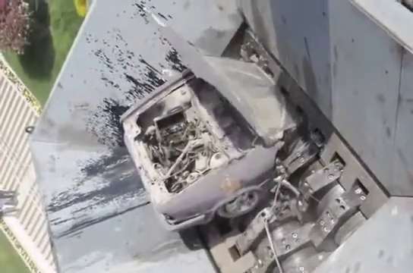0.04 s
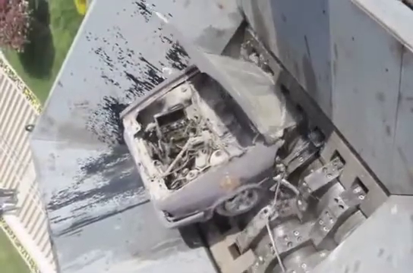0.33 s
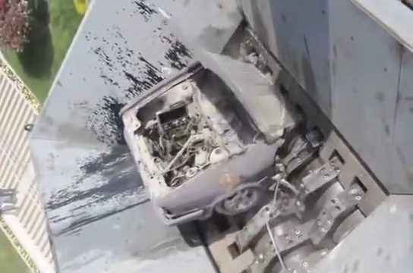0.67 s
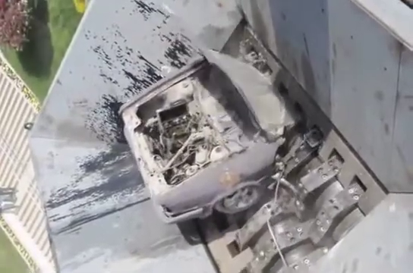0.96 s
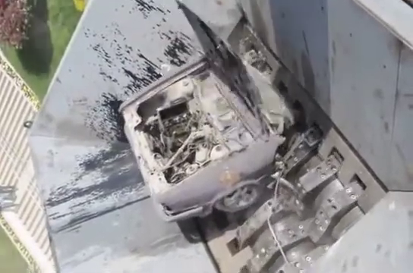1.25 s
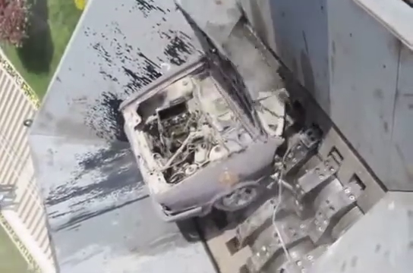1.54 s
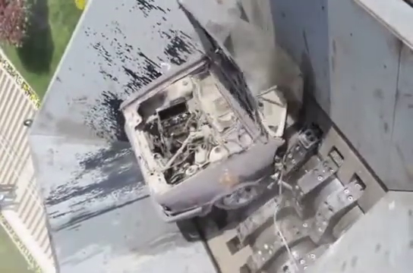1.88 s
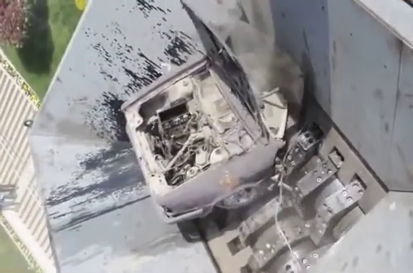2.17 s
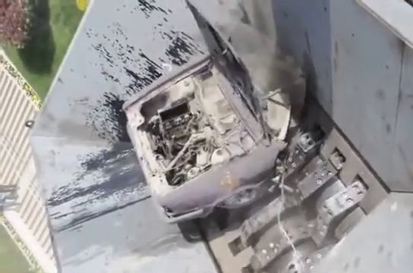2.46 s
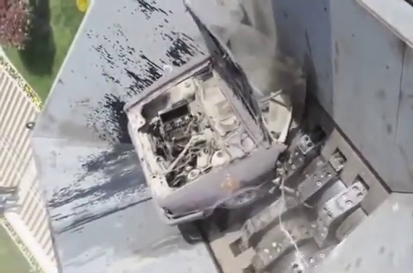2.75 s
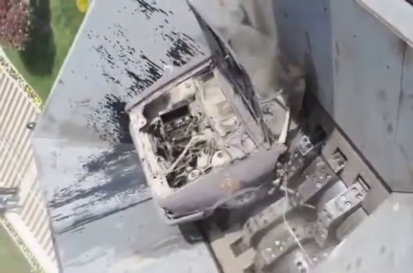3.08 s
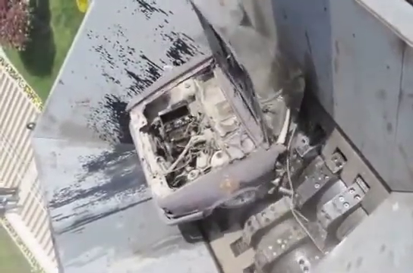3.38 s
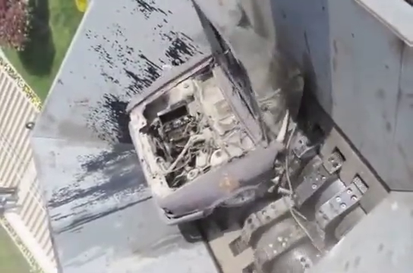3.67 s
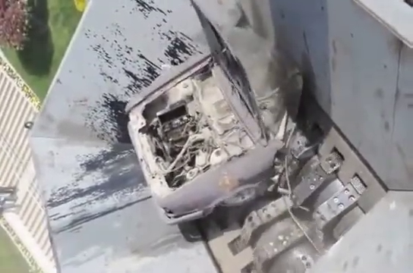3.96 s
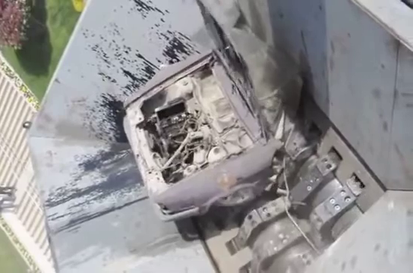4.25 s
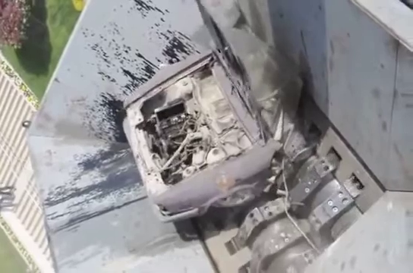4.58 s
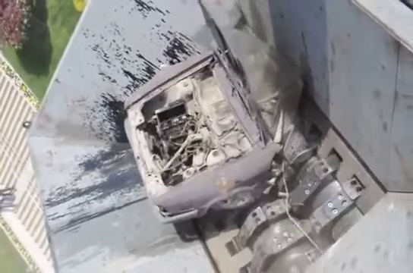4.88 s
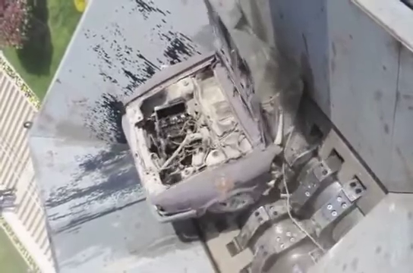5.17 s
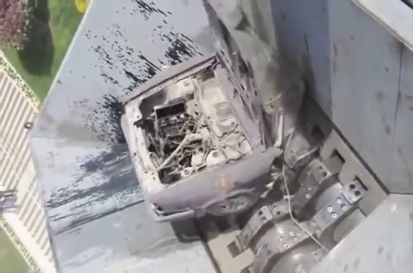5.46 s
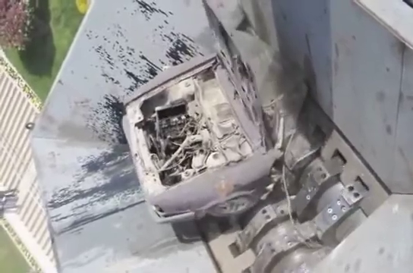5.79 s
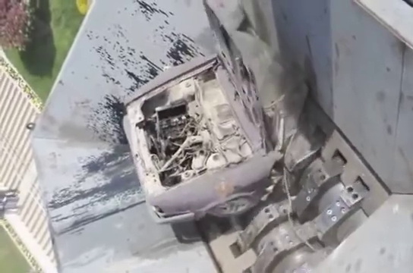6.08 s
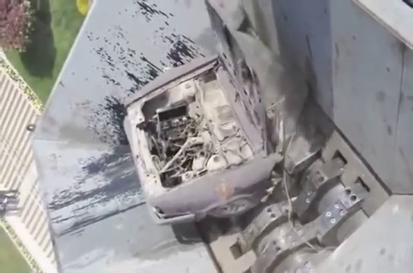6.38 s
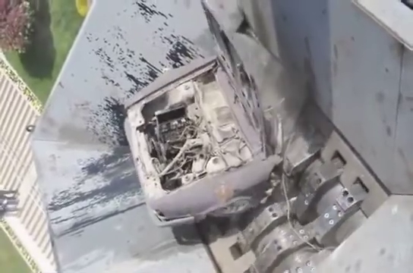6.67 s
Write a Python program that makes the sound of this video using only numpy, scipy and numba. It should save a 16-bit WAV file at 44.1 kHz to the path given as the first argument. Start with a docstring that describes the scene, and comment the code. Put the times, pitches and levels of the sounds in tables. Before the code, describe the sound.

Over the steady whine of hydraulic pumps, a car body crunches and crackles as a slow shredder draws it in. Parts snap and clank throughout, with two especially sharp bangs before the midpoint. Toward the end come a low shudder, a short tearing groan, a thin buzz and a ringing scrape. The microphone is above the steel hopper, which adds a short echo.

```python
"""A scrapyard: a slow twin-shaft shredder tears up a car body in its steel hopper.
Two hydraulic pumps whine underneath. Stick-slip on the cutters makes a panel judder, an edge buzz and
a strut and a bar scrape; a seam groans open. Up front, sheet metal crumples in a stream of small
fractures and gives way in sharp cracks and clanks. A limiter ducks the mix after the loudest bangs."""
import sys
import numpy as np
from scipy import signal
from scipy.fft import rfft, irfft
from scipy.io import wavfile
from scipy.ndimage import uniform_filter1d
from numba import njit

SR = 44100
rng = np.random.default_rng(int(sys.argv[2]) if len(sys.argv) > 2 else 0)


def store_pcm(level_fs):
    """Save levels as 16-bit WAV."""
    pcm = np.round(np.clip(level_fs, -1, 1) * 32767).astype(np.int16)
    wavfile.write(sys.argv[1], SR, np.atleast_2d(pcm).T)


N = 296793
TIME = np.arange(N) / SR

# steady partials of the pump whine: (multiple of the piston rate, level [dB])
PUMP_PARTIALS = [(1, -40), (3, -38), (4, -41.5), (5, -42), (8, -43.5)]
# two partials sing out as the pump's load shifts: (time [s], second partial [dB], sixth partial [dB])
LOAD_PARTIALS = [(0, -27, -39), (.7, -26, -34.5), (1.4, -25, -27.5), (2.5, -29.5, -27.5), (2.9, -30, -28),
                 (3.4, -30.5, -30), (3.9, -25, -25), (4.201, -31, -31.5), (4.85, -27, -27),
                 (5.4, -35.5, -36.5), (5.9, -40, -31.5), (6.73, -31.5, -27.5)]
# a second pump beats against the first: (time [s], pitch [Hz], level [dB])
SECOND_PUMP = [(1, 462, -74), (1.6, 465.7, -37), (2.3, 457.3, -38), (3.5, 456.2, -43.5), (4.6, 465, -33),
               (5.1, 455.3, -42), (5.6, 465.6, -39.5), (6.73, 459, -41)]
# a thin edge chatters: (time [s], level [dB])
CHATTER = [(5.66, -41), (5.72, -30), (5.78, -27), (5.83, -49), (5.85, -64)]
# a panel sticks and slips on a cutter: (time [s], slip rate [Hz], level [dB])
JUDDER = [(4.44, 34, -46), (4.53, 34.3, -28.5), (4.9, 34.3, -31), (4.99, 37, -37), (5.28, 41, -30.5),
          (5.5, 33.8, -33), (5.66, 33.7, -39), (5.78, 30, -32), (5.86, 34, -53)]
# low drone of that panel: (frequency [Hz], level [dB], t60 [s])
PANEL_MODES = [(68, -17, 0.13), (106, -2, 0.074), (136, 4.5, 0.13), (177.4, 4.5, 0.23), (204, 1.5, 0.15)]
# a seam tears open: (time [s], level [dB])
GROAN = [(5.21, -34), (5.25, -20), (5.31, -21.5), (5.37, -21.5), (5.41, -18), (5.48, -19.5), (5.53, -37)]
# midrange body of the tearing sheet: (frequency [Hz], level [dB], t60 [s])
SEAM_MODES = [(383, -3.5, 0.032), (510, -1.5, 0.019), (770, -7, 0.024), (938, 1, 0.023),
              (1085, -0.5, 0.017), (1410, -6, 0.011), (1766, -9, 0.022), (2480, -12, 0.018)]
# a cutter bears on a thin strut, later on a steel bar: (time [s], pressure [dB])
STRUT_SCRAPE = [(1.495, -46), (1.52, -12.5), (1.54, -40), (1.58, -18), (1.63, -45)]
BAR_SCRAPE = [(6.0, -51), (6.02, -25.5), (6.06, -19.5), (6.09, -16.5), (6.125, -22), (6.15, -26),
              (6.19, -38)]
# bright ring of the strut and the bar: (frequency [Hz], level [dB], t60 [s])
STRUT_MODES = [(2280, -2.5, 0.12), (3300, -2, .15), (3750, -1, .08), (4270, -3, .04), (5400, -4, .06)]
BAR_MODES = [(2630, -13, .12), (3100, -7, 0.14), (3300, -12, .1), (3837, -2.5, 0.2), (4330, -3, .02),
             (4680, -2.5, .025), (5020, -5, 0.04), (5440, -3, 0.025)]
# tone colour of the torn bodywork: (frequency [Hz], spectral level [dB])
SHEET_COLOUR = [(30, -38), (70, -40), (110, -14), (180, -8.5), (300, 3), (550, 0), (800, 1), (1250, -5.5),
                (1600, -7.5), (2100, -12), (2700, -11.5), (3600, -14.5), (5000, -14)]
# three sizes of piece, panels, folds and splinters: (low edge [Hz], high edge [Hz], base t60 [s])
PIECES = [(25, 606, 0.075), (780, 2150, 0.088), (1980, 5180, 0.027)]
# balance of the crumpling: (panels [dB], folds [dB], splinters [dB])
CRUMPLE_MIX_DB = (2.5, 0, -2.5)
# bed of crumpling as the cutters draw the body in: (time [s], level [dB], brightness [dB])
FEED = [(0, -32, 0.5), (0.24, -33.5, -1), (0.6, -30, 1), (1.1, -27.5, -0.5), (1.4, -29.5, 0),
        (1.75, -27.5, -1.5), (2.4, -27, 1), (2.75, -25, -1), (3.24, -34.5, -0.5), (3.55, -30, 1.5),
        (4.15, -27.5, -1.5), (4.38, -33, 1), (4.47, -26.5, 0.5), (4.8, -28, -1), (5.4, -28, -0.5),
        (5.57, -30, -1), (5.9, -28, 2.5), (6.65, -30.5, -0.5)]
# swells as a cutter catches a sheet and folds it: (start [s], length [s], level [dB], brightness [dB])
FOLDS = [(0.077, 0.064, -31, 5), (0.275, 0.06, -23.5, 0.5), (0.462, 0.086, -27.5, -3),
         (0.838, .19, -26.5, 3), (1.257, 0.056, -25.5, 2), (1.482, 0.14, -27.5, 6), (1.678, 0.042, -24, -7),
         (2.166, 0.14, -27, -3), (2.351, 0.04, -25.5, 1.5), (2.791, 0.14, -30, -12), (2.95, .08, -33, -7),
         (3.283, 0.15, -30, 5.5), (3.794, 0.072, -28.5, 0), (4.016, 0.078, -20, 1), (4.112, 0.032, -27, 2),
         (4.234, .08, -29, 2.5), (5.044, 0.049, -23.5, 0), (5.231, 0.12, -26.5, 1.5),
         (5.698, 0.11, -29.5, -4), (6.195, 0.061, -24.5, 1), (6.321, 0.089, -23.5, 2),
         (6.436, .07, -27, -1), (6.664, .1, -24, 0)]
# parts spring free with a pitched clank or boom: (time [s], pitch [Hz], level [dB])
CLANKS = [(1.644, 3150, -19.5), (1.924, 893, -17), (2.624, 1140, -12.5), (2.651, 1800, -12.5),
          (2.875, 2700, -13), (3.267, 1634, -15.5), (3.941, 703, -17), (3.954, 1767, -13.5),
          (4.233, 195, -14.5), (4.432, 790, -23), (5.498, 580, -16), (5.844, 1540, -9), (6.127, 775, -18),
          (6.383, 4520, -11)]
# parts give way; big ones thud, small ones snap: (time [s], level [dB], brightness [dB])
CRACKS = [(0.079, -20, -1.5), (0.31, -19, -6), (0.321, -21.5, -0.5), (0.336, -20, -5), (0.405, -22.5, -1),
          (0.485, -23, 3.5), (0.5, -22, 2.5), (0.536, -14.5, -6), (0.604, -20, -5), (0.665, -22.5, -0.5),
          (0.695, -26.5, 0.5), (0.752, -22.5, -0.5), (0.837, -19, 0.5), (0.864, -18.5, 0.5),
          (0.93, -21.5, -5.5), (1.155, -11, -2.5), (1.306, -24.5, 1), (1.55, -21.5, 7), (1.645, -20.5, 4),
          (1.688, -16, -6.5), (1.782, -23.5, 0), (1.87, -22.5, 0.5), (1.922, -19.5, -1),
          (2.032, -22.5, -0.5), (2.19, -21, 1), (2.27, -16.5, -15), (2.352, -18.5, 0.5), (2.421, -21.5, 22),
          (2.443, -20, -2.5), (2.623, -20.5, -4), (2.649, -8.5, 6), (2.846, -23, -0.5), (2.874, -8.5, 6.5),
          (2.947, -19, 1), (2.971, -17, 2.5), (3.113, -19, 2), (3.167, -15, 1), (3.185, -21.5, -20),
          (3.266, -15, 10), (3.462, -14, -6.5), (3.472, -15, -1), (3.875, -26, 10), (3.941, -19.5, 0.5),
          (3.954, -26, -2.5), (4.064, -19, 7), (4.083, -14.5, 2), (4.18, -20, 5), (4.234, -19, 2.5),
          (4.25, -19.5, -4), (4.298, -22.5, 7), (4.431, -21, -2), (4.881, -23, 6), (4.924, -18.5, 4.5),
          (4.95, -14, 3), (5.07, -24.5, 5), (5.093, -24, -3), (5.18, -24, 8.5), (5.24, -19.5, -8.5),
          (5.497, -21, -5), (5.748, -27, -1), (5.843, -15, 0), (6.035, -19, -3.5), (6.127, -18, -1.5),
          (6.206, -20.5, -9), (6.383, -15.5, 4), (6.483, -19, -1.5), (6.508, -26, -4)]


def undb(db):
    """Decibels to gain."""
    return 10 ** (np.asarray(db) / 20)


def unit(x):
    """Scale to rms 1."""
    return x / np.sqrt(np.mean(x ** 2) + 1e-18)


def curves(table):
    """Automation curves: a table's columns, joined by straight lines in time."""
    times, *columns = np.transpose(table)
    return [np.interp(TIME, times, column) for column in columns]


def fader(table):
    """Gain from a table's last column, muted outside its time span."""
    active = (TIME >= table[0][0]) & (TIME <= table[-1][0])
    return active * undb(curves(table)[-1])


def wander(rate_hz):
    """Smooth random modulation with a spread near 1."""
    step = max(int(SR / rate_hz), 2)
    return uniform_filter1d(np.repeat(rng.standard_normal(1024), step)[:N], step)


def convolve(x, response):
    """Pass a sound through an impulse response."""
    return signal.oaconvolve(x, response)[:N]


def clicks(times, sizes):
    """A train of single impulses."""
    return np.bincount(np.clip(times * SR, 0, N - 1).astype(int), sizes, N)


def slips(hz, jitter, scatter_db):
    """Stick-slip: one impulse a cycle, uneven in timing and force."""
    cycles = np.floor(np.cumsum(hz * (1 + jitter * wander(40))) / SR)
    return np.diff(cycles, prepend=0) * undb(scatter_db * rng.standard_normal(N))


def ring(drive, modes):
    """Drive damped modes; each one's level sets its share of the response's energy."""
    t = TIME[:SR // 2]
    response = sum((-1) ** k * undb(db) * unit(np.cos(2 * np.pi * hz * t) * undb(-60 * t / t60))
                   for k, (hz, db, t60) in enumerate(modes))
    return unit(convolve(drive, response))


def pumps(piston_hz=224.85, drift=0.00027, waver_db=1.0):
    """Background whine: piston pulses of two hydraulic pumps, nearly constant in speed."""
    phase = 2 * np.pi * np.cumsum(piston_hz * (1 + drift * wander(7.7))) / SR
    whine = 0
    for multiple, db in [*PUMP_PARTIALS, *zip((2, 6), curves(LOAD_PARTIALS))]:
        gain = undb(db + waver_db * wander(7))
        whine += gain * np.sin(multiple * phase + rng.uniform(0, 2 * np.pi))
    hz, db = curves(SECOND_PUMP)
    second_pump = undb(db) * np.sin(2 * np.pi * np.cumsum(hz) / SR)
    return np.sqrt(2) * (whine + second_pump)


def edge_chatter():
    """A thin edge buzzes against a cutter, ringing in one high mode."""
    taps = slips(hz=71, jitter=0.0168, scatter_db=-2.0)
    return fader(CHATTER) * ring(taps, [(2390, 0, 0.027)])


def panel_judder():
    """Slow stick-slip makes a large panel drone."""
    slip_hz, _ = curves(JUDDER)
    return fader(JUDDER) * ring(slips(slip_hz, jitter=0.012, scatter_db=2.0), PANEL_MODES)


def seam_groan():
    """Quick, uneven slips of a tearing seam keep the sheet sounding; the hopper walls smear them."""
    tearing = slips(hz=170, jitter=0.2, scatter_db=3)
    smeared = convolve(tearing, rng.standard_normal(SR // 80))
    return fader(GROAN) * ring(smeared, SEAM_MODES)


def sheet_noise(low_hz, high_hz, peak_db=5.0, spacing_hz=130):
    """Dense resonances of bent sheet; a few stand out, different ones each time."""
    freqs = np.fft.rfftfreq(SR // 5, 1 / SR) + 1
    hz, db = np.transpose(SHEET_COLOUR)
    colour_db = np.interp(np.log(freqs), np.log(hz), db)
    peaks_db = peak_db * np.interp(freqs / spacing_hz, np.arange(256), rng.standard_normal(256))
    band = 1 / np.sqrt((1 + (low_hz / freqs) ** 12) * (1 + (freqs / high_hz) ** 12))
    return irfft(rfft(rng.standard_normal(SR // 5)) * band * undb(colour_db + peaks_db))


def fracture(low_hz, high_hz, t60, tear_s, rise_cycles=1.14, hopper_t60=0.27, hopper_db=-18):
    """Metal tears briefly, dies fast and echoes in the hopper. Large pieces have a softer attack."""
    t = TIME[:SR // 5]
    since_tear = np.maximum(t - tear_s, 0)
    attack = 1 - np.exp(-t * high_hz / rise_cycles)
    decay = undb(-60 * since_tear / t60)
    hopper_tail = undb(hopper_db - 60 * since_tear / hopper_t60)
    burst = sheet_noise(low_hz, high_hz) * attack * (decay + hopper_tail)
    return burst / np.sqrt(np.mean(burst[:SR // 80] ** 2))  # the transient sets the level


def cutter_scrape(pressure, modes, grit_db, ring_db):
    """Fast, uneven slips hiss and set a steel part ringing, which sings on after the cutter has left."""
    force = fader(pressure)
    rub = slips(hz=900, jitter=0.47, scatter_db=7.5) * rng.choice([-1, 1], N)
    grain = fracture(low_hz=2900, high_hz=6300, t60=0.0086, tear_s=0.00046)
    grit = force * unit(convolve(rub, grain))
    ringing = np.std(force) * ring(force * rub, modes)
    return undb(grit_db) * grit + undb(ring_db) * ringing


def piece_gains(db, bright_db):
    """Share a level among panels, folds and splinters: brightness favours the small pieces."""
    shares = undb(np.multiply.outer([-1, 0, 1], bright_db))
    return undb(db) * shares / np.sqrt(np.mean(shares ** 2, axis=0))


def crumple_envelopes(attack_s=0.023, release_s=0.023):
    """Gain for each size of piece: the steady feed plus a swell for every fold."""
    power = piece_gains(*curves(FEED)) ** 2
    for start, length, db, bright_db in FOLDS:
        fade_in = (TIME - start) / attack_s
        fade_out = 1 - (TIME - start - length) / release_s
        swell = np.clip(np.minimum(fade_in, fade_out), 0, 1)
        power += np.outer(piece_gains(db, bright_db), swell) ** 2
    return np.sqrt(power)


def crumpling(spread_db=2.5, scatter_db=1, decay_scale=0.77, count=2400, variants=20):
    """The main crunch: a stream of small fractures, mostly weak and a few strong, over many folds."""
    times = rng.uniform(0, N / SR, count)
    force_db = spread_db * np.minimum(rng.exponential(size=count), 4)
    out = np.zeros(N)
    for (low, high, t60), envelope, mix_db in zip(PIECES, crumple_envelopes(), CRUMPLE_MIX_DB):
        sizes = undb(force_db + scatter_db * rng.standard_normal(count))
        stream = np.zeros(N)
        for k in range(variants):
            grain = fracture(low, high, t60 * decay_scale, tear_s=0.0003)
            stream += convolve(clicks(times[k::variants], sizes[k::variants]), grain)
        # hold the crunch at an even level, so its loudness follows the feed and fold envelopes
        power = uniform_filter1d(uniform_filter1d(stream ** 2, SR // 18), SR // 30)
        out += envelope * undb(mix_db) * stream / np.sqrt(np.abs(power) + 1e-6)
    return out


def clanks(t60=0.058, detune=0.08, rise_cycles=0.77):
    """A freed part rings briefly in a close pair of modes, damped by the scrap around it."""
    t = TIME[:SR // 5]
    out = np.zeros(N + SR)
    for start, hz, db in CLANKS:
        pair = np.sin(2 * np.pi * hz * t) + 0.5 * np.sin(2 * np.pi * hz * (1 - detune) * t)
        attack = 1 - np.exp(-t * hz / rise_cycles)
        onset = int(start * SR)
        out[onset:onset + len(t)] += 2 * attack * undb(db - 60 * t / t60) * pair
    return out[:N]


def splinters(typical_delay_s=0.009, level_db=-14.5, tear_s=0.0005, decay_scale=0.46, per_crack=3):
    """A few slivers break off just after each crack and make it ragged."""
    times, db, bright_db = np.transpose(CRACKS)
    low, high, t60 = PIECES[-1]
    delays = typical_delay_s * rng.uniform(0.5, 1.9, (len(times), per_crack))
    sizes = undb(level_db) * piece_gains(db, bright_db)[-1]  # relative to each crack's top band
    return sum(convolve(clicks(times + delay, sizes), fracture(low, high, t60 * decay_scale, tear_s))
               for delay in delays.T)


def cracks(tear_s=0.0038, decay_scale=0.96, mix_db=(-1.5, -0.5, -1)):
    """The big hits: larger parts give way, sounding panel, fold and splinters at once."""
    out = np.zeros(N + SR)
    for start, db, bright_db in CRACKS:
        onset = int(start * SR)
        for (low, high, t60), gain, trim_db in zip(PIECES, piece_gains(db, bright_db), mix_db):
            burst = gain * undb(trim_db) * fracture(low, high, t60 * decay_scale, tear_s)
            out[onset:onset + len(burst)] += burst
    return out[:N]


def scene():
    """All layers meet in mono, at one microphone above the hopper."""
    breaking = crumpling() + cracks() + clanks() + splinters()
    strut = cutter_scrape(STRUT_SCRAPE, STRUT_MODES, grit_db=-3.0, ring_db=-6.0)
    bar = cutter_scrape(BAR_SCRAPE, BAR_MODES, grit_db=2.5, ring_db=1.5)
    friction = strut + bar + panel_judder() + seam_groan() + edge_chatter()
    return (breaking + friction + pumps())[None]


@njit
def follow(x, attack_s, release_s):
    """Envelope follower with separate attack and release times."""
    envelope, level = np.empty(len(x)), 0.
    for i in range(len(x)):
        lag_s = attack_s if abs(x[i]) > level else release_s
        level += (abs(x[i]) - level) / (lag_s * SR)
        envelope[i] = level
    return envelope


def record(dry, low_cut_hz=62, high_cut_hz=5600, limit_db=-7, ceiling=0.7, top_hz=16000):
    """A narrow-band chain: its limiter ducks after bangs, and only their first peaks clip."""
    x = signal.sosfilt(signal.butter(2, low_cut_hz, "high", fs=SR, output="sos"), dry[0])
    envelope = follow(x, attack_s=0.00043, release_s=0.098)
    limited = x / np.maximum(envelope / undb(limit_db), 1)
    high_cut = signal.firwin(131, high_cut_hz, window=("kaiser", 9), fs=SR)
    clipped = np.clip(signal.fftconvolve(limited, high_cut, "same"), -ceiling, ceiling)
    top_cut = signal.ellip(8, 0.2, 70, top_hz, fs=SR, output="sos")
    return signal.sosfilt(top_cut, clipped)[None]


dry = scene()
out = record(dry)
store_pcm(out)
```